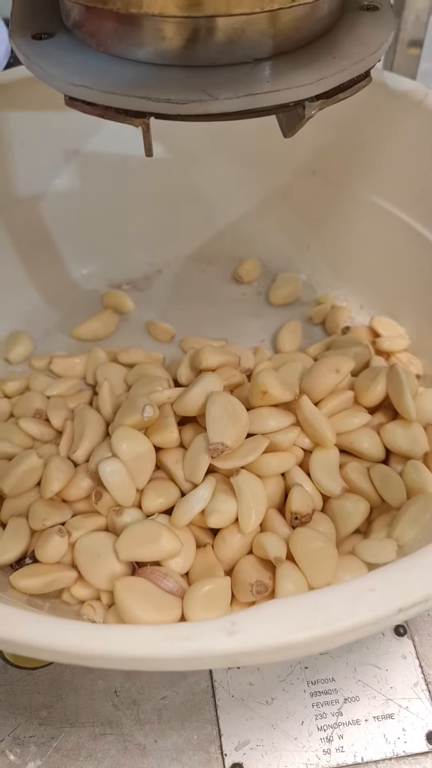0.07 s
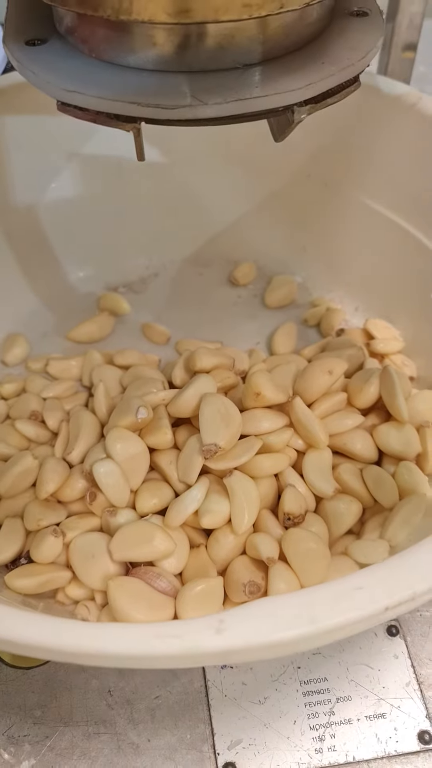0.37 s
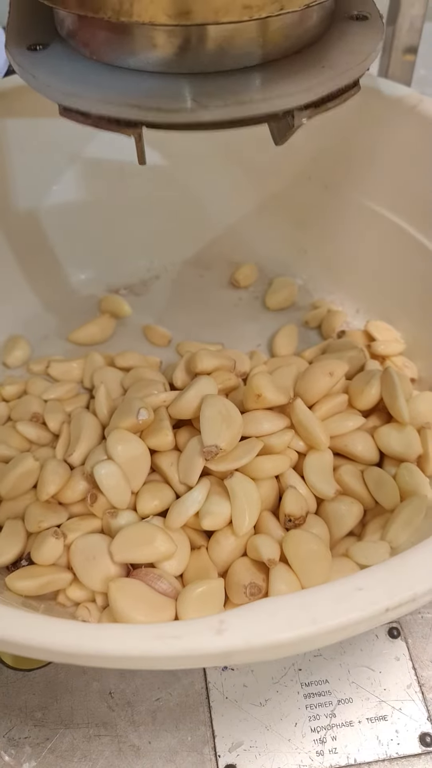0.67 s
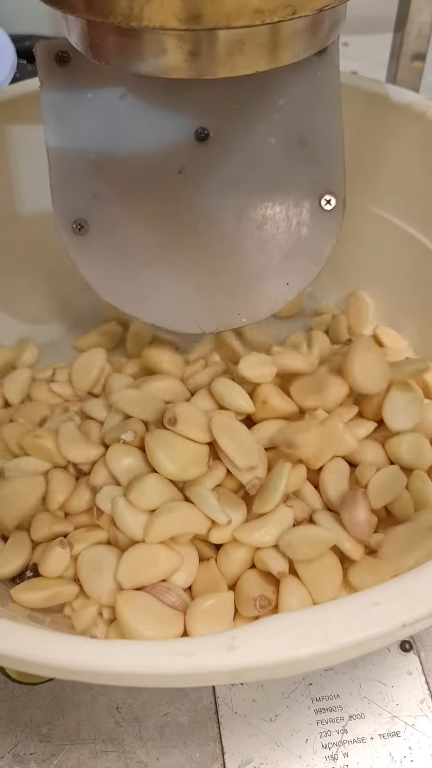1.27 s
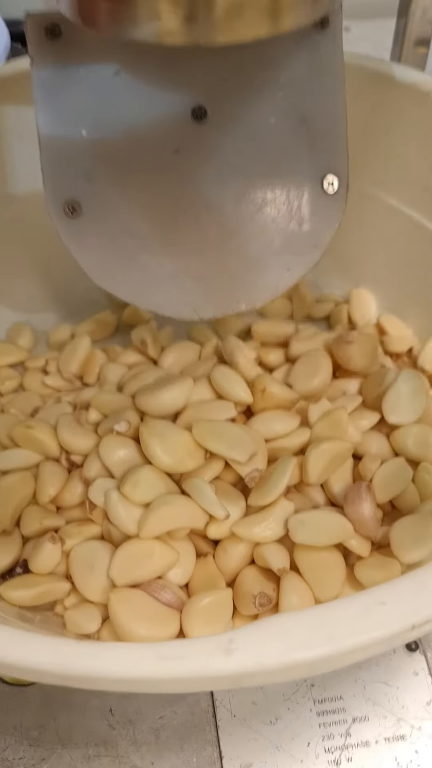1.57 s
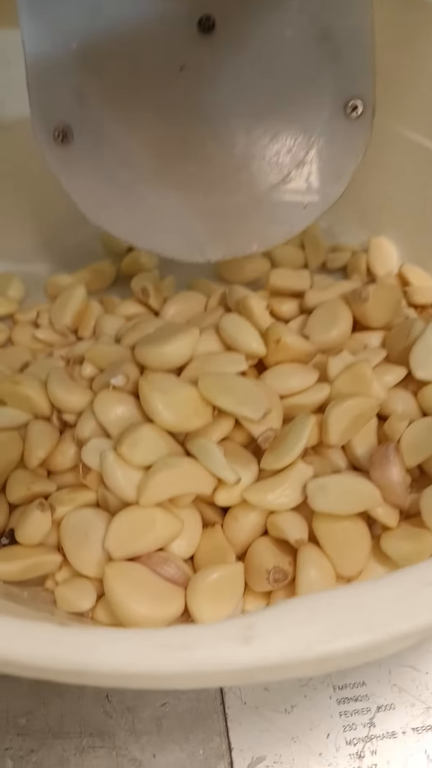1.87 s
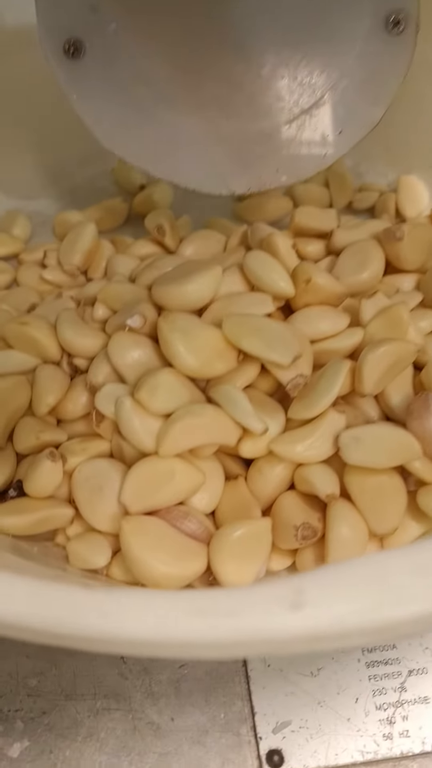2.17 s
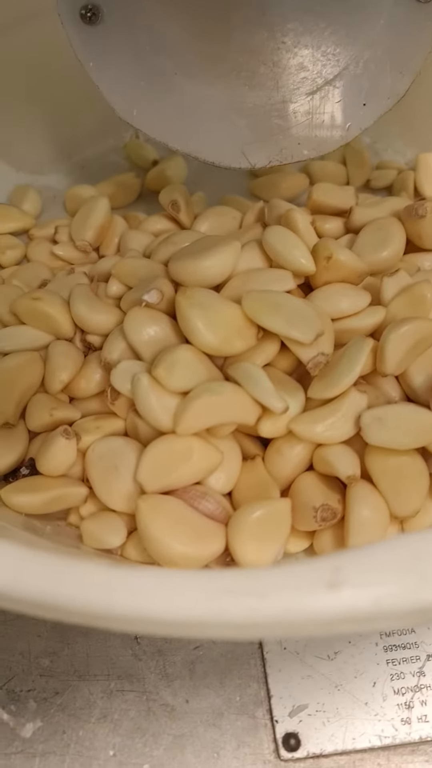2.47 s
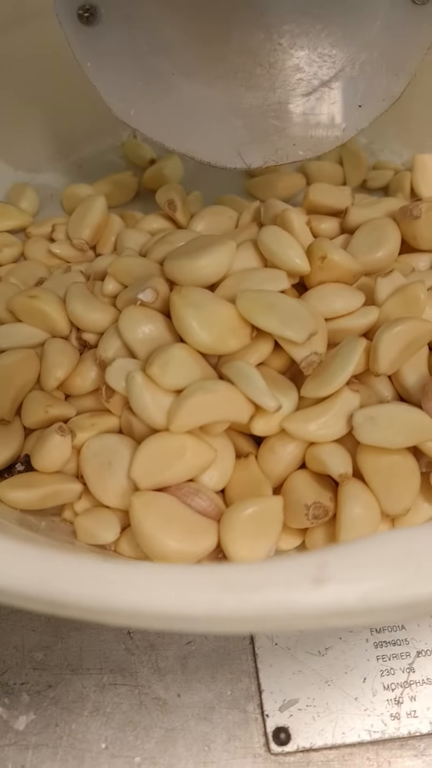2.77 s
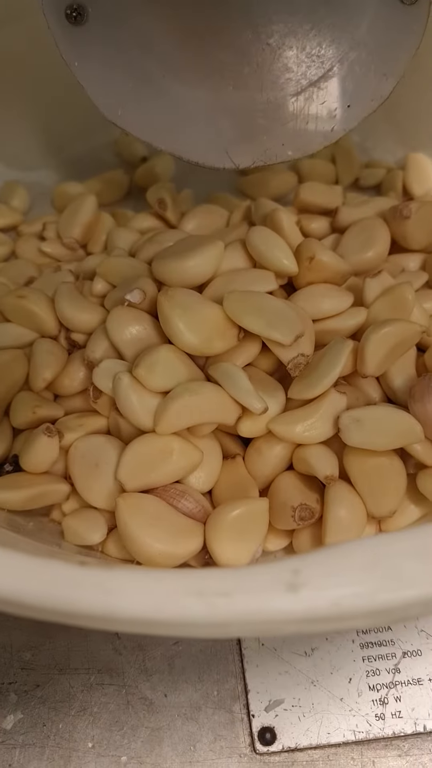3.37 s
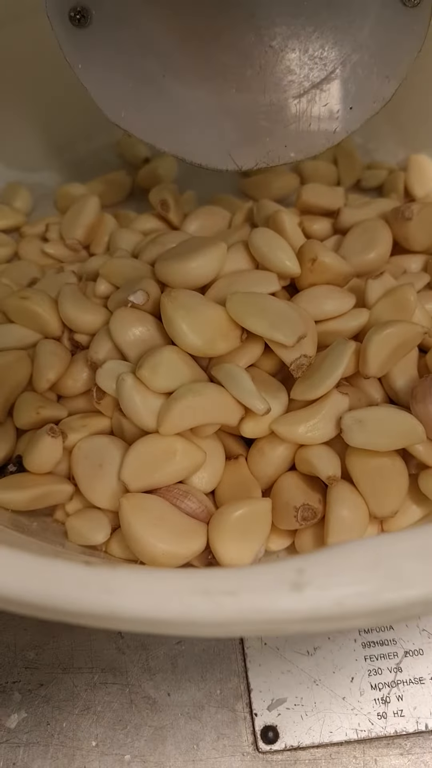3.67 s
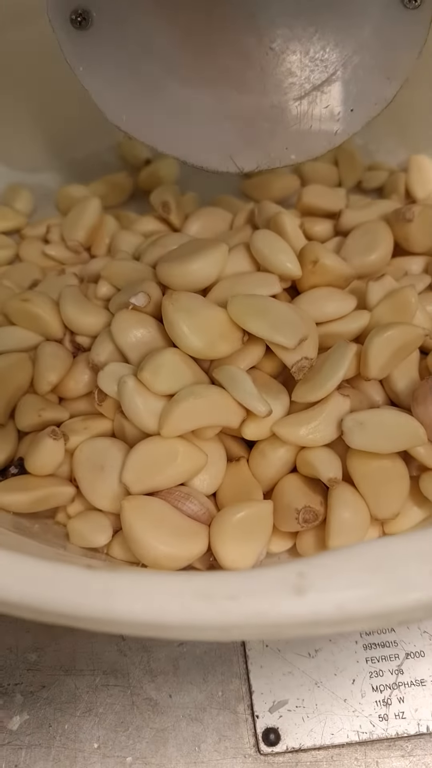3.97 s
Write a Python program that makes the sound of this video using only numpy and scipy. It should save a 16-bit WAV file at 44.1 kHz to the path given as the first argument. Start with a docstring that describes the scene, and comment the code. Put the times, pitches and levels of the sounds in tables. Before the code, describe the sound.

Compressed air hisses in a garlic peeler, then a flap clacks and cloves tumble out.

```python
"""A small hard room, a motor humming throughout, two microphone ports close to a garlic peeler's outlet.
A compressed-air jet hisses and whirls cloves round a steel drum, ringing its air resonances.
The valve shuts with a thump and the air bleeds away, whistling faintly. The bottom flap swings open
and clacks on its stop, and the cloves drop on to the heap in a resonant plastic bowl."""
import sys
import numpy as np
from scipy import signal
from scipy.fft import rfft, irfft
from scipy.io import wavfile
from scipy.ndimage import uniform_filter1d, map_coordinates

SR = 44100
rng = np.random.default_rng(int(sys.argv[2]) if len(sys.argv) > 2 else 0)


def wrap_up_sound(samples):
    """Save the sound to the file named by the first command line argument, as 16-bit audio."""
    columns = np.atleast_2d(samples).T
    # keep every value between -1 and 1, then stretch to whole-number steps
    tamed = np.clip(columns, -1, 1)
    steps = np.round(tamed * 32767).astype(np.int16)
    wavfile.write(sys.argv[1], SR, steps)


N = 176400  # 4 s


def undb(db):
    """Decibels to gain."""
    return 10 ** (np.asarray(db) / 20)


def unit(x):
    """Scale to rms 1."""
    return x / np.sqrt(np.mean(x ** 2))


def pan(db):
    """Channel gains for a left-minus-right level."""
    return undb(np.array([[.5], [-.5]]) * db)


def curve(rows):
    """Interpolate (time [s], value) rows per sample."""
    return np.interp(np.arange(N) / SR, *np.array(rows).T)


def bins_hz():
    """Frequency of each spectral bin."""
    return np.maximum(np.arange(N // 2 + 1), 1) * SR / N


def spectrum(rows):
    """Interpolate (frequency [Hz], value) rows per bin, on a log axis."""
    hz, value = np.array(rows).T
    return np.interp(np.log(bins_hz()), np.log(hz), value)


def pan_bands(pair, rows):
    """Pan by (frequency [Hz], pan [dB]) rows."""
    return irfft(rfft(pair) * pan(spectrum(rows)), N)


def resonance(hz, half_width_hz):
    """Peak of height 1, per bin."""
    return 1 / (1 + ((bins_hz() - hz) / half_width_hz) ** 2)


def colour(x, gain):
    """Minimum-phase filter from a gain per bin."""
    cepstrum = irfft(np.log(gain + 1e-9), N)
    cepstrum[1:N // 2] *= 2
    cepstrum[N // 2 + 1:] = 0
    return irfft(rfft(x) * np.exp(rfft(cepstrum)), N)


def wander(rate_hz):
    """Smooth bounded random signal, rms 1."""
    hold = int(SR / rate_hz)
    steps = np.repeat(rng.uniform(-1.1, 1, N // hold + 1), hold)
    return unit(uniform_filter1d(steps, hold)[:N])


# left port's lead for outlet sounds: (frequency [Hz], phase [rad])
PORT_LEAD = [(50, .12), (130, .42), (290, 1.15), (700, 2.265), (1100, 2.92), (1500, 4.3), (6500, 16.68)]
OUTLET_COHERENT_HZ, DRUM_COHERENT_HZ, CLOVE_COHERENT_HZ = 1700, 2600, 1200


def ports(pair, coherent_hz, near=True):
    """Two ports share the lows but not the highs; near sounds reach the right one later."""
    left, other = rfft(pair)
    shared = 1 / (1 + (bins_hz() / coherent_hz) ** 6)
    lag = np.exp(-1j * spectrum(PORT_LEAD) * near)
    right = (shared * left + np.sqrt(1 - shared ** 2) * other) * lag
    return irfft(np.array([left, right]), N)


def turbulence(gain, coherent_hz, near=True):
    """Coloured air noise at both ports, rms 1."""
    white = rng.standard_normal((2, N))
    return unit(colour(ports(white, coherent_hz, near), gain))


def impact(t60_s, snap, size=8192):
    """Contact impulse of height snap plus a dense decay of unit energy."""
    ring = rng.standard_normal((2, size)) * undb(-60 * np.arange(size) / SR / t60_s)
    ring /= np.sqrt(np.sum(ring ** 2) / 2)
    ring[:, 0] += snap
    return ring


def place(sound, start_s, db):
    """Place a short sound; db is the level of its energy spread over 10 ms."""
    out, first = np.zeros((2, N)), int(start_s * SR)
    part = sound[:, :N - first]
    out[:, first:first + part.shape[1]] = part * undb(db) * np.sqrt(.02 * SR / np.sum(part ** 2))
    return out


def patter(gain, per_s, spread_db, t60_s):
    """Small clove impacts at random times and strengths, rms 1."""
    hits = (rng.random(N) < per_s / SR) * undb(spread_db * np.clip(rng.standard_normal(N), -2, 2))
    rung = signal.fftconvolve(hits[None], impact(t60_s, snap=.57))[:, :N]
    return unit(colour(ports(rung, CLOVE_COHERENT_HZ), gain))


# cloves on the drum wall: (frequency [Hz], relative density [dB])
RATTLE_SPECTRUM = [(60, -9), (160, -3.5), (300, -6), (600, -6), (1000, -24), (2200, -11.5), (4000, -11),
                   (12000, -22)]


def wall_rattle():
    """Flung cloves hit the steel wall; level at peak flow."""
    return undb(-29) * patter(undb(spectrum(RATTLE_SPECTRUM)), per_s=88, spread_db=6, t60_s=.04)


# drum air modes: (frequency [Hz], half-width [Hz], level at peak flow [dB], pan [dB])
DRUM_MODES = [(180.7, 77, -39, 1), (728.5, 87, -22.5, 1), (1355, 52, -25.5, -0.5), (1658, 49, -36, -6),
              (1900, 45.6, -30.5, 0), (1998, 45, -27, -1), (2303, 37, -28, -2), (2657, 71, -26.5, -4.5),
              (2885, 35, -32.5, -0.5), (3324, 85, -31.5, 1), (6040, 200, -26.5, -5), (6550, 260, -28, -3.5)]
DRUM_WAVER_DB, DRUM_DRIFT_RATIO = 1.5, .008


def drum_air():
    """The air in the drum resonates; the whirling cloves shift its modes."""
    modes = 0
    for hz, half_width_hz, db, pan_db in DRUM_MODES:
        band = turbulence(resonance(hz, half_width_hz), DRUM_COHERENT_HZ)
        modes += band * undb(db + DRUM_WAVER_DB * wander(20)) * pan(pan_db)
    read_position = np.cumsum(1 + DRUM_DRIFT_RATIO * wander(12))
    return np.array([map_coordinates(side, [read_position], mode="mirror") for side in modes])


# jet flow: (time [s], level [dB])
JET_ENVELOPE = [(0, -16.5), (.3, -17.5), (.545, -17), (.575, -20), (.61, -26.5), (.685, -26), (.72, -34.5),
                (.85, -47.5), (1.1, -94)]
# jet hiss: (frequency [Hz], relative density [dB])
JET_SPECTRUM = [(100, -20.5), (240, -0.5), (450, -14), (1050, -10), (1550, -10), (2150, -7.5), (2500, 0),
                (3080, -7.5), (3400, 1.5), (5000, -0.5), (6900, -1), (7700, -4.5), (12300, -1),
                (15500, -8.5)]
# hiss balance: (frequency [Hz], pan [dB])
JET_PAN = [(1000, 6), (2500, -6), (4500, -1.5), (6500, -2.5), (15000, 4.5)]
JET_BOOST_DB, JET_FLUTTER_DB = 1.5, 1


def jet():
    """The turbulent jet hisses; its flow drives the rattle and the drum's modes."""
    flow = undb(curve(JET_ENVELOPE))
    hiss = turbulence(undb(spectrum(JET_SPECTRUM)), OUTLET_COHERENT_HZ)
    hiss *= undb(JET_BOOST_DB + JET_FLUTTER_DB * wander(60))
    driven = wall_rattle() + drum_air()
    return flow * (pan_bands(hiss, JET_PAN) + driven / flow.max())


# shaft harmonics: (order, level [dB], pan [dB], waver [dB])
HUM_HARMONICS = [(2, -32.5, 0.24, .5), (3, -39, -0.5, 0.46), (7, -57, -2, 0.5), (8, -57, -2.5, -0.5),
                 (9, -58.5, 1, 1), (10, -59, -4, 1.5), (12, -56, -2, 6)]
# swell of order 2, applied about its mean: (time [s], level [dB])
HUM_SWELL = [(0, -31.5), (2.2, -30.5), (2.55, -26.5), (2.9, -31), (3.3, -28), (3.6, -31), (3.95, -27.5)]
# motor whines: (frequency [Hz], level [dB], pan [dB])
MOTOR_WHINES = [(2337, -69.5, 4), (3770, -76.5, -18.5), (12791, -91.5, 11.5)]
SHAFT_HZ, SHAFT_DRIFT_RATIO, HUM_RIGHT_LEAD_S = 32.34, .0029, .00089
WHINE_JITTER_RATIO, WHINE_FLICKER_DB = .002, 2


def motor():
    """The shaft hums at wavering harmonics, under a few thin whines."""
    turns = np.cumsum(SHAFT_HZ * (1 + SHAFT_DRIFT_RATIO * wander(5))) / SR
    turns = turns + np.array([[0], [SHAFT_HZ * HUM_RIGHT_LEAD_S]])
    swell_db = curve(HUM_SWELL) - curve(HUM_SWELL).mean()
    out = 0
    for order, db, pan_db, waver_db in HUM_HARMONICS:
        tone = np.cos(2 * np.pi * (order * turns + rng.random()))
        out += tone * undb(db + swell_db * (order == 2) + waver_db * wander(8)) * pan(pan_db)
    for hz, db, pan_db in MOTOR_WHINES:
        tone = np.sin(2 * np.pi * np.cumsum(hz * (1 + WHINE_JITTER_RATIO * wander(40))) / SR)
        out += tone * undb(db + wander(3) + WHINE_FLICKER_DB * wander(14)) * pan(pan_db)
    return np.sqrt(2) * out


# ventilation hiss: (frequency [Hz], relative density [dB])
VENT_SPECTRUM = [(76, -43.5), (130, -11.5), (237, -4), (400, -5.5), (905, -17.5), (1300, -17), (2270, -23),
                 (4060, -29), (6800, -27.5), (8200, -37), (15500, -50.5)]
# hiss balance: (frequency [Hz], pan [dB])
VENT_PAN = [(200, 0), (3000, -4.5), (6500, -5), (8000, 1)]
# room rumble: (frequency [Hz], relative density [dB])
RUMBLE_SPECTRUM = [(15, -2.5), (30, -5.5), (60, 10.5), (110, -2), (160, -14.5), (900, -64.5)]
VENT_DB, VENT_WAVER_DB, RUMBLE_DB = -46.5, .23, -43


def ventilation():
    """Moving room air: steady hiss and rumble."""
    hiss = turbulence(undb(spectrum(VENT_SPECTRUM)), coherent_hz=381.2, near=False)
    hiss = pan_bands(hiss, VENT_PAN) * undb(VENT_DB + VENT_WAVER_DB * wander(6.5))
    rumble = turbulence(undb(spectrum(RUMBLE_SPECTRUM)), coherent_hz=200, near=False)
    return hiss + undb(RUMBLE_DB) * rumble


# knocks on the drum, and at 0.824 s a small puff of the bleeding air: (time [s], frequency [Hz], bandwidth
# [Hz], level [dB])
TONAL_BURSTS = [(.045, 175, 29.4, -22), (.488, 2004, 50, -20), (.824, 825, 25.2, -28)]


def tonal_bursts(rise_s=.003):
    """Each event rings one tone: the first two knocks ring resonances of the drum, the last is a small puff of
    the bleeding air."""
    t = np.arange(SR // 4) / SR
    out = 0
    for start_s, hz, bandwidth_hz, db in TONAL_BURSTS:
        envelope = np.exp(-np.pi * bandwidth_hz * t) * (1 - np.exp(-t / rise_s))
        ring = np.sin(2 * np.pi * hz * t) * envelope
        out += place(np.array([ring, ring]), start_s, db)
    return ports(out, DRUM_COHERENT_HZ)


# bleed flow: (time [s], level [dB])
BLEED_ENVELOPE = [(.5, -56), (.6, -22.5), (.75, -28.5), (.97, -31.5), (1.03, -37.5), (1.1, -44.5),
                  (1.25, -51), (1.8, -87)]
# bleed hiss: (frequency [Hz], relative density [dB])
BLEED_SPECTRUM = [(150, -1), (500, -4.5), (780, 0.5), (1100, -9), (1700, -5.5), (2900, -0.5), (6000, -2.5),
                  (7200, -4), (9000, -15), (11500, -19.5), (15500, -30)]
# hiss balance: (frequency [Hz], pan [dB])
BLEED_PAN = [(700, 3.5), (3000, -2.5), (6500, -2.5), (8000, 2.5)]
# whistles: (frequency [Hz], peak over hiss [dB])
BLEED_WHISTLES = [(1910, 13.5), (4050, 4), (5250, 6), (5780, 9.5)]


def bleed():
    """Air leaves the flap's cylinder: a duller, whistling hiss that fades as the pressure runs down."""
    whistles_db = sum(db * resonance(hz, half_width_hz=50) for hz, db in BLEED_WHISTLES)
    hiss = turbulence(undb(spectrum(BLEED_SPECTRUM) + whistles_db), coherent_hz=875)
    return pan_bands(hiss, BLEED_PAN) * undb(curve(BLEED_ENVELOPE))


# valve thump: (frequency [Hz], relative gain [dB])
VALVE_SPECTRUM = [(40, -4), (110, 2.5), (280, 0.5), (450, -5), (650, 4.5), (880, -4.5), (1060, 4),
                  (1500, -13.5), (6000, -54.5)]


def valve():
    """The valve shuts with one dull thump."""
    hit = impact(t60_s=.08, snap=.52)
    padded = np.pad(hit, ((0, 0), (0, N - hit.shape[1])))
    thump = colour(padded, undb(spectrum(VALVE_SPECTRUM)))
    return place(thump, start_s=.552, db=-14) * pan(db=5.5)


# plastic bowl modes: (frequency [Hz], half-width [Hz], gain [dB])
BOWL_MODES = [(250, 140, -8), (550, 59, -2), (764, 140, -3), (1090, 117, 0.5), (1750, 450, -11.5),
              (3300, 200, -26.5)]
BOWL_FLOOR_DB, BOWL_PAN_DB = -18.5, 4.5


def bowl_gain():
    """Gain per bin of the resonant bowl under the heap."""
    modes = sum(undb(db) * resonance(hz, half_width_hz) for hz, half_width_hz, db in BOWL_MODES)
    return undb(BOWL_FLOOR_DB) + modes


# pour of cloves: (time [s], level [dB])
POUR_ENVELOPE = [(.95, -50), (.99, -24.5), (1.05, -27.5), (1.12, -31), (1.3, -32.5), (1.4, -38),
                 (1.6, -46.5), (1.9, -78)]
# pour ahead of the bowl's modes: (frequency [Hz], relative density [dB])
POUR_SPECTRUM = [(50, 1), (140, 4), (400, 0.5), (1130, -8.5), (4000, -12.5), (10000, -37.5)]


def pour():
    """The mass of cloves patters into the bowl."""
    hits = patter(undb(spectrum(POUR_SPECTRUM)) * bowl_gain(), per_s=170, spread_db=3, t60_s=.025)
    return hits * undb(curve(POUR_ENVELOPE)) * pan(BOWL_PAN_DB)


# flap on its stop: (time [s], level [dB])
FLAP_HITS = [(.977, -21), (.981, -26), (.987, -26.5)]
# flap clack: (frequency [Hz], relative gain [dB])
FLAP_SPECTRUM = [(80, -6), (250, 3), (450, -6), (1000, -1.5), (1500, -2), (2650, -4), (3400, -1),
                 (5000, -9), (8000, -11.5), (15000, -20.5)]
# drum modes rung by the flap: (frequency [Hz], half-width [Hz], peak over clack [dB])
FLAP_DRUM_MODES = [(695, 55, 18), (1957, 50, 12), (2210, 50, 8), (3380, 150, 6)]


def flap():
    """The flap hits its stop, chatters and rings the drum."""
    clack = sum(place(impact(t60_s=.072, snap=.34), start_s, db) for start_s, db in FLAP_HITS)
    modes_db = sum(db * resonance(hz, half_width_hz) for hz, half_width_hz, db in FLAP_DRUM_MODES)
    body = unit(undb(spectrum(FLAP_SPECTRUM) + modes_db))
    return colour(clack, body) * pan(db=3.5)


# landings: (time [s], level before bowl gain [dB], low edge [Hz], high edge [Hz])
CLOVE_LANDINGS = [(0.993, -17.5, 60, 170), (1.024, -26, 90, 1500), (1.035, -19, 200, 2350),
                  (1.102, -24.5, 280, 1900), (1.123, -25.5, 300, 2600), (1.139, -25, 600, 3220),
                  (1.161, -28.5, 300, 3000), (1.195, -22, 280, 1585), (1.207, -30, 300, 1700),
                  (1.255, -31, 250, 905), (1.2609, -13, 600, 3380), (1.281, -24.5, 400, 1990),
                  (1.3314, -16.5, 1400, 2860), (1.478, -28.5, 250, 2010), (1.498, -32.5, 250, 1990),
                  (1.554, -39, 700, 2300), (1.705, -29, 200, 1800), (1.724, -42, 400, 2900),
                  (1.853, -35.5, 1900, 2540)]


def clove_landings():
    """Single cloves knock on the heap and the bowl, each with its own loudness and brightness."""
    out = 0
    for start_s, db, low_hz, high_hz in CLOVE_LANDINGS:
        highpass = signal.butter(2, low_hz, "high", fs=SR, output="sos")
        lowpass = signal.butter(6, high_hz, fs=SR, output="sos")
        knock = signal.sosfilt(np.vstack([highpass, lowpass]), impact(t60_s=.035, snap=.52))
        out += place(knock, start_s, db)
    return colour(out, bowl_gain()) * pan(BOWL_PAN_DB)


# hard contacts: (time [s], level [dB])
CONTACT_TICKS = [(1.263, -56), (1.958, -63)]


def ticks(low_hz=4500):
    """Hard contacts give thin, sharp ticks."""
    highpass = signal.butter(2, low_hz, "high", fs=SR, output="sos")
    return sum(place(signal.sosfilt(highpass, impact(t60_s=.03, snap=.18)), start_s, db)
               for start_s, db in CONTACT_TICKS)


# ringing metal: (time [s], frequency [Hz], level [dB], T60 [s])
METAL_RINGS = [(2.02, 8100, -61, 0.52)]


def metal_ring(rise_s=.012):
    """A faint high metal ring swells and fades."""
    out = 0
    for start_s, hz, db, t60_s in METAL_RINGS:
        age_s = np.maximum(np.arange(N) / SR - start_s, 0)
        envelope = (1 - np.exp(-age_s / rise_s)) * undb(db - 60 * age_s / t60_s)
        out += np.sin(2 * np.pi * hz * age_s) * envelope
    return out


def room(x, t60_s=.22, tail_db=-12, predelay_s=.006):
    """Hard walls add a short diffuse tail."""
    t = np.arange(SR // 2) / SR
    tail = rng.standard_normal((2, len(t))) * undb(-60 * t / t60_s) * (t > predelay_s)
    tail /= np.sqrt(np.sum(tail ** 2) / 2)
    return x + undb(tail_db) * signal.fftconvolve(x, tail, axes=1)[:, :N]


def scene():
    """Air, impacts and the pour over motor and ventilation."""
    impacts = pour() + ports(valve() + flap(), OUTLET_COHERENT_HZ)
    impacts += ports(clove_landings(), CLOVE_COHERENT_HZ)
    peeler = jet() + bleed() + room(impacts) + tonal_bursts() + ticks() + metal_ring()
    return peeler + motor() + ventilation()


def record(dry, top_hz=15800):
    """A steep low-pass cuts the top."""
    return signal.sosfilt(signal.ellip(10, .1, 80, top_hz, fs=SR, output="sos"), dry)


dry = scene()
out = record(dry)
wrap_up_sound(out)
```